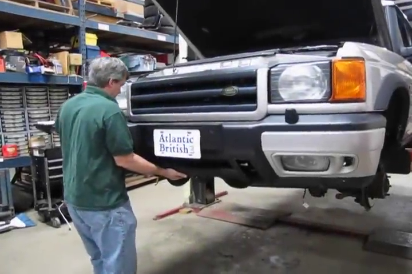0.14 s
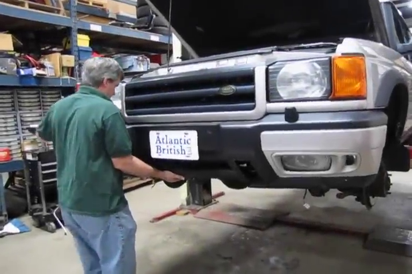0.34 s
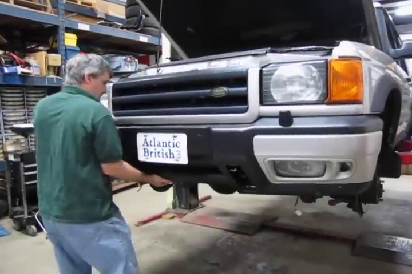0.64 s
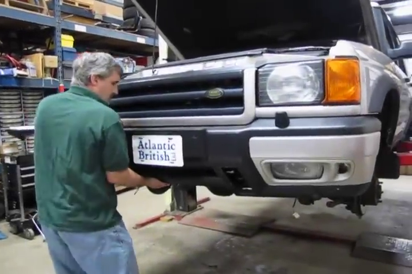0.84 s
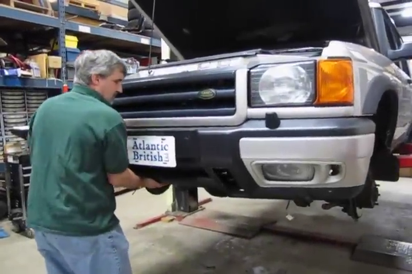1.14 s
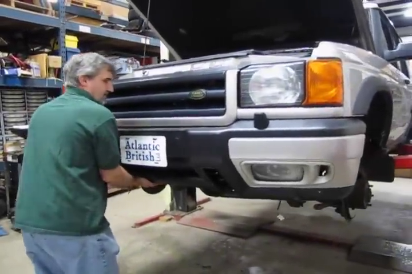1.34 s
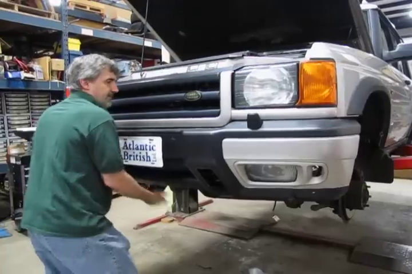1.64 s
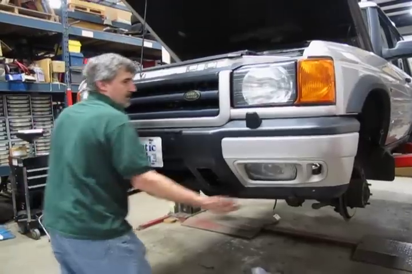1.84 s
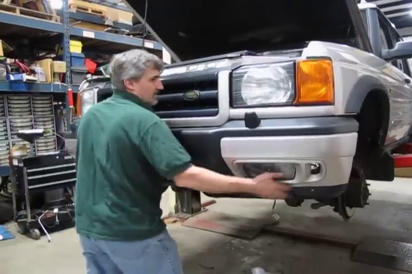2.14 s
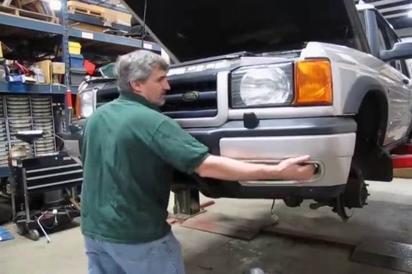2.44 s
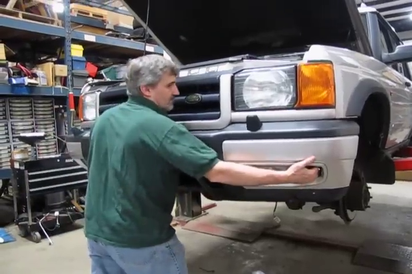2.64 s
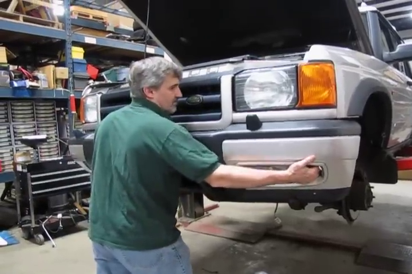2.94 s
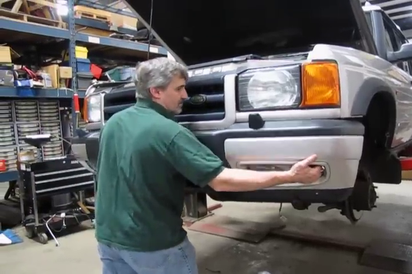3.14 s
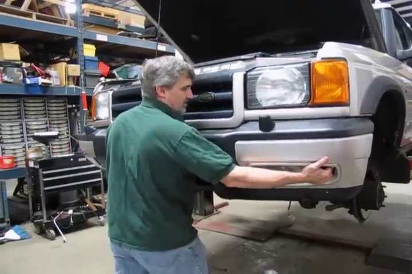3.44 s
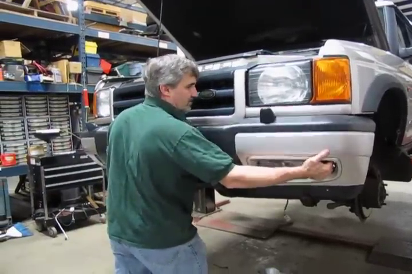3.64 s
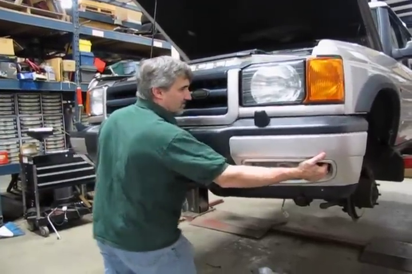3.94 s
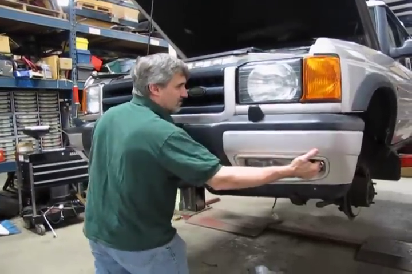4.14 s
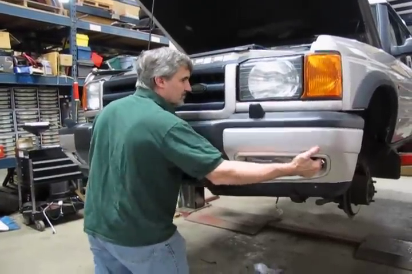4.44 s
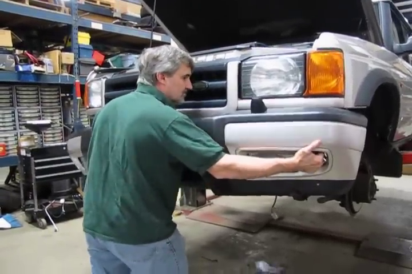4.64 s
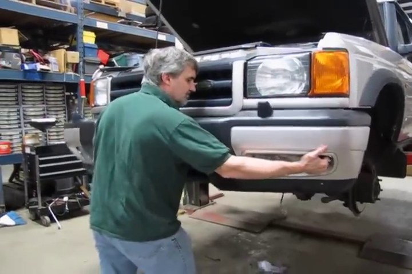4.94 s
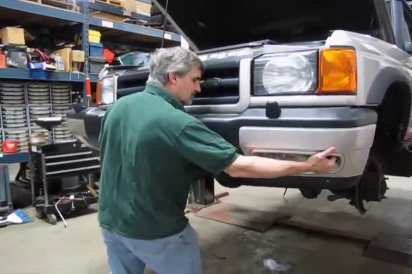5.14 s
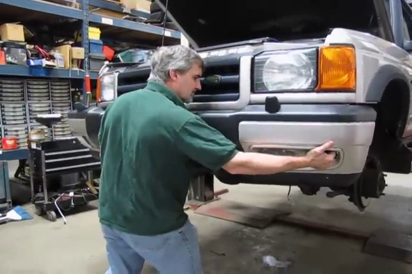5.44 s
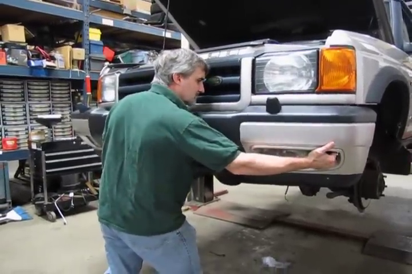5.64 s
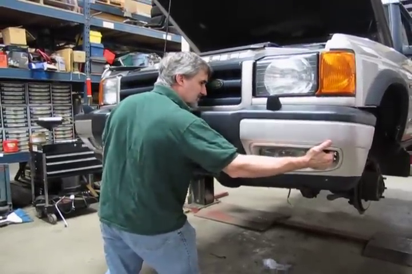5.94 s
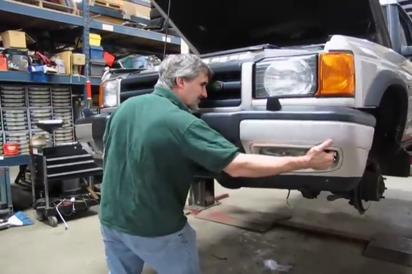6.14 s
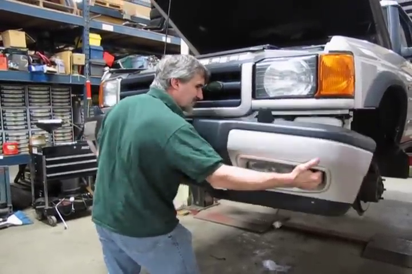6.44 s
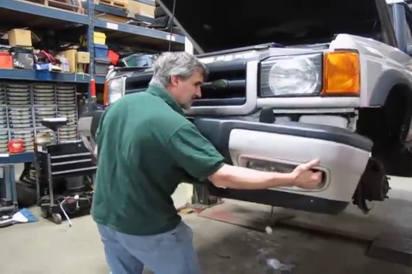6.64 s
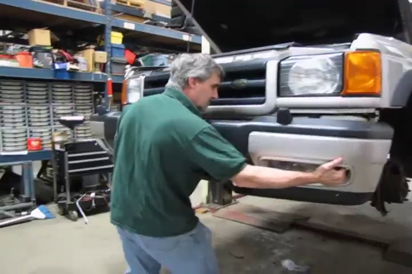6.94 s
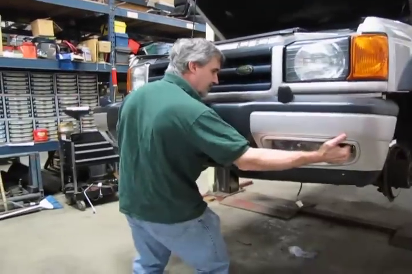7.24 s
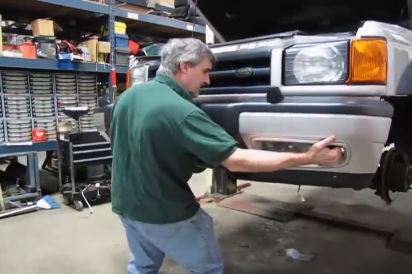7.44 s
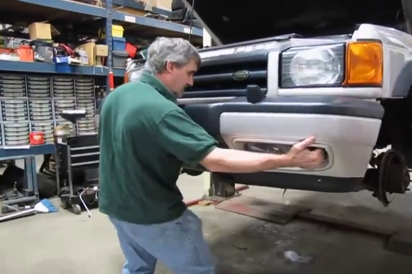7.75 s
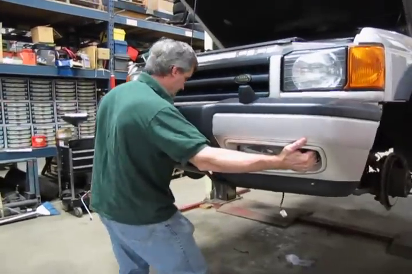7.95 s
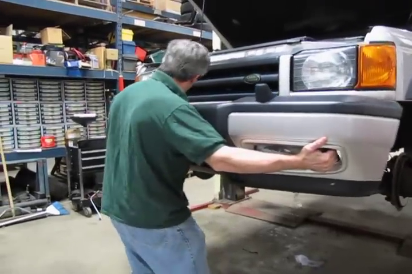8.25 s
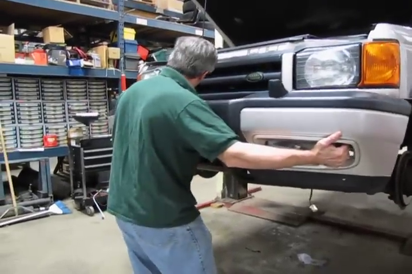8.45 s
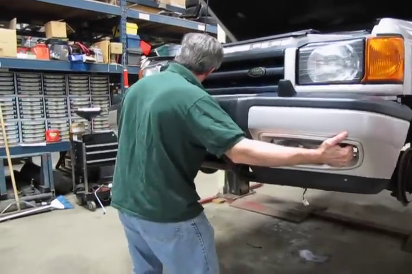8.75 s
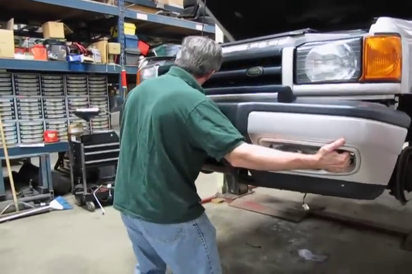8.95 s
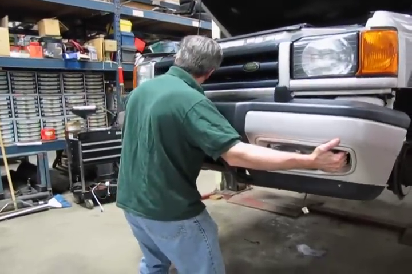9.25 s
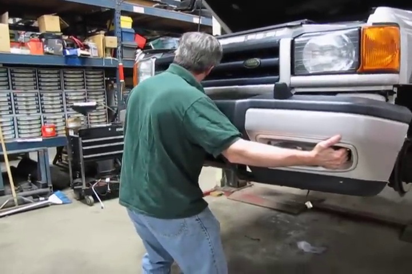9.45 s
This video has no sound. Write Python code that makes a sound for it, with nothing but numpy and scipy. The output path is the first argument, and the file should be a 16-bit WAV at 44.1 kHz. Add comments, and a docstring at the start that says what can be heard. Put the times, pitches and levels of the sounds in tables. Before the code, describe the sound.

In a humming workshop, a heavy hollow metal bumper is rocked and dragged off its brackets, knocking, rattling and scraping, then coming free with loud clunks.

```python
"""Workshop machines hum while a heavy steel car bumper with a plastic cover is rocked and dragged off its brackets.
It knocks, chatters and scrapes, and shoes scuff the floor; then it drops free with two loud clunks.
The automatic gain control ducks at the loudest clunk and recovers slowly; soft bumps follow as a higher hum swells.
Noise and random tiny contacts make the rubbing, grit and snaps; fading vibrations make the bumper and steel ring."""
import sys
import numpy as np
from scipy import signal
from scipy.fft import rfft, irfft, next_fast_len
from scipy.io import wavfile
from scipy.ndimage import uniform_filter1d

SR = 44100
rng = np.random.default_rng(int(sys.argv[2]) if len(sys.argv) > 2 else 0)


def materialize(psi):
    """Save the field psi as 16-bit PCM at rate SR to the path in sys.argv[1].

    A 1-D psi becomes a single channel; in a 2-D psi each row is a channel.
    """
    bounded = np.clip(np.atleast_2d(psi).T, -1, 1)
    quanta = np.round(bounded * 32767).astype(np.int16)
    wavfile.write(sys.argv[1], SR, quanta)


N = 422478  # length in samples
TOP_HZ = 16100  # nothing sounds above this


def amp(db):
    """Decibels to gain."""
    return 10 ** (np.asarray(db) / 20)


def rms(x):
    """Root mean square: the average strength of a sound."""
    return np.sqrt(np.mean(x ** 2) + 1e-20)


def along(points, hz):
    """Read a curve of (Hz, value) points, with pitch on a log axis."""
    f, v = np.transpose(points)
    return np.interp(np.log(hz + 1), np.log(f + 1), v)


def curves(rows):
    """One value per sample for each column after the time."""
    s, *columns = np.transpose(rows)
    return [np.interp(np.arange(N) / SR, s, column) for column in columns]


def wobble(rate, size):
    """A random curve of straight pieces, with rate knots a second."""
    knots = rng.standard_normal(size // 40)
    return np.interp(np.arange(size) * rate / SR, np.arange(size // 40), knots)


def filtered(x, response):
    """Multiply the spectrum of x by a response of frequency."""
    n = x.shape[-1]
    padded = next_fast_len(n + 8192)
    hz = np.fft.rfftfreq(padded, 1 / SR)
    return irfft(rfft(x, padded) * response(hz), padded)[..., :n]


def band(x, edges):
    """Keep only the pitches between two edges in Hz."""
    return signal.sosfilt(signal.butter(3, edges, 'band', fs=SR, output='sos'), x)


# How alike the two ears are. Each row: frequency in Hz, left-right likeness (1 is identical).
EAR_LIKENESS = [(100, 0.96), (300, 0.98), (600, 0.94), (1100, 0.79), (2200, 0.45), (4000, 0.3),
                (8000, 0.047)]


def ear_angle(hz):
    """Likeness as an angle: 0 when both ears are identical."""
    return np.arccos(np.clip(along(EAR_LIKENESS, hz), -1, 1))


def stereo_noise(spectrum, size):
    """Coloured noise, alike in both ears in the bass and nearly unrelated in the treble."""
    def mid_side(hz):
        half = ear_angle(hz) / 2
        return amp(along(spectrum, hz)) * [np.cos(half), np.sin(half)]

    mid, side = filtered(rng.standard_normal((2, size)), mid_side)
    return np.array([mid + side, mid - side])


def dying(x, decay):
    """Each frequency of x dies at its own speed, given as seconds to fall by 60 dB."""
    hz, t, z = signal.stft(x, SR, nperseg=128)
    fade = amp(-60 * t / along(decay, hz)[:, None])
    return signal.istft(z * fade, SR, nperseg=128)[1][:, :x.shape[-1]]


def add(track, s, sound):
    """Mix a sound in at time s, in seconds."""
    part = track[:, max(round(s * SR), 0):][:, :sound.shape[-1]]
    part += sound[:, :part.shape[-1]]


def slips(rate, spread_db, size):
    """Tiny contacts at random moments, about rate a second, with randomly varying strength."""
    chance, strength = rng.random(size), rng.standard_normal(size)
    happens = chance < rate / SR
    return happens * amp(spread_db * np.clip(strength, -2, 2)) * rng.choice([-1, 1], size)


def grains(rate, life, size):
    """Envelope of rms 1: each slip flares up and its power dies within its life in seconds."""
    hits = slips(rate, spread_db=0, size=size) ** 2
    power = signal.lfilter([1], [1, -np.exp(-1 / (life * SR))], hits)
    return np.sqrt(power / power.mean())


def patchy(x, depth_db):
    """As the contact point wanders, different resonances come forward and fall back."""
    z = signal.stft(x, nperseg=1024)[2]
    field = rng.standard_normal(z.shape[1:])
    field = uniform_filter1d(field, size=3, axis=0)  # smooth over frequency
    field = uniform_filter1d(field, size=5, axis=1)  # smooth over time
    return signal.istft(z * amp(depth_db * field / rms(field)), nperseg=1024)[1][:, :x.shape[-1]]


# Colour of the workshop rumble. Each row: frequency in Hz, relative level in dB per Hz.
AIR_COLOUR = [(20, -7.5), (42, 3.5), (70, -3.5), (105, 3.5), (135, -13.5), (220, -16), (300, -26.5),
              (600, -26.5), (1200, -31), (2500, -39), (5000, -39.5), (10000, -47), (16000, -52)]
# Steady motor hums. Each row: frequency in Hz, level in dB.
MOTOR_HUMS = [(59.3, -48), (96, -54), (111, -58.5)]
# A higher hum that swells near the end. Each row: time in seconds, level in dB.
HIGH_HUM = [(0, -59), (7.3, -64), (8.3, -51), (9.58, -48.5)]


def background():
    """Ventilation rumble is coloured noise; motor hums are sines with slightly unsteady timing."""
    t = np.arange(N) / SR

    def tone(hz, drift):  # drift in radians
        return np.sqrt(2) * np.sin(2 * np.pi * hz * t + drift * wobble(rate=9.3, size=N))

    air = stereo_noise(AIR_COLOUR, size=N)
    hum = sum(amp(db) * tone(hz, drift=hz / 160) for hz, db in MOTOR_HUMS)
    high_hum = amp(curves(HIGH_HUM)[0]) * tone(194, drift=0.13)
    return amp(-43.0) * air / rms(air) + hum + high_hum


# How long the hall echoes. Each row: frequency in Hz, time to fall by 60 dB in seconds.
HALL_DECAY = [(150, 0.28), (500, 0.4), (2500, 0.51), (7000, 0.51), (14000, 0.17)]


def workshop(x, wet_db):
    """Diffuse echo of the cluttered hall: a fresh noise tail answers each quarter second of sound."""
    out, step = np.zeros((2, N)), SR // 4
    colour = [(100, 7.5), (2000, 0.5), (6000, -0.5), (15000, -0.5)]  # Hz, relative dB
    for start in range(0, N, step):
        tail = dying(stereo_noise(colour, size=SR * 2 // 3), HALL_DECAY)
        tail = tail / np.linalg.norm(tail[0])
        echo = signal.fftconvolve(x[:, start:start + step], tail, axes=1)
        add(out, start / SR + .008, echo)  # the echo sets in 8 ms late
    return amp(wet_db) * out


# Shoes twisting on the concrete. Each row: start in seconds, length in seconds, level in dB.
SHOE_SCUFFS = [(0.29, 0.12, -31.5), (0.653, 0.1, -33), (1.064, 0.17, -34), (2.041, 0.12, -36),
               (2.175, 0.14, -28.5), (8.139, 0.064, -26)]
# Colour of the sole, with a faint squeak near 1.7 kHz. Each row: frequency in Hz, relative level in dB per Hz.
SOLE_COLOUR = [(200, -10.5), (700, -9), (1150, -13), (1450, -5.5), (1700, -0.5), (2050, -6.5), (2700, -9),
               (3900, -8.5), (6000, -16.5), (10000, -27.5), (16000, -35)]


def scuffs():
    """A rubber sole drags over gritty concrete: many short grains of noise swell and fade with the pressure."""
    out, t = np.zeros((2, N)), np.arange(SR // 5) / SR
    for s, length, db in SHOE_SCUFFS:
        pressure = np.sin(np.pi * np.clip(t / length, 0, 1)) ** 1.65
        drag = grains(rate=1700, life=0.0016, size=len(t)) * stereo_noise(SOLE_COLOUR, len(t))
        add(out, s, amp(db) * pressure * drag / rms(drag))
    return out


# Blows of the bumper on its brackets, and a few soft bumps and footfalls. Each row: time in seconds,
# strength in dB, hardness in dB per octave, thud over the strength in dB, chatter time in seconds.
BLOWS = [(.12, -48, -11, -9, 0.032), (.664, -41.5, 5.5, 0, 0.047), (0.739, -49, -9, 7, 0.02),
         (1.303, -31, 0.3, 1.5, 0.032), (1.565, -32.5, -1.5, -4, 0.02), (1.687, -28.5, 0.4, -8, 0.01),
         (2.011, -36.5, -2, 3.5, 0.04), (2.269, -31.5, -1.5, 0, 0.024), (2.479, -48.5, -6, 16, 0.017),
         (2.903, -27, -1, -3, 0.024), (2.933, -24.5, -0.5, -3.5, 0.017), (3.019, -39.5, 1.5, 13, 0.012),
         (3.075, -38.5, -4, 3, 0.011), (3.113, -43, -1.5, 1, 0.017), (3.192, -39.5, -6, 14, 0.0053),
         (3.2, -34, 2, -3.5, 0.022), (3.223, -30.5, 2.5, -15.5, 0.037), (3.297, -26, 0, 2.5, 0.03),
         (3.587, -36, -13, 13.5, 0.023), (3.611, -35.5, 2, -2, 0.013), (3.66, -34.5, -1.5, 5, 0.026),
         (3.723, -30.5, 3.5, 3, 0.018), (3.87, -29.5, -1, 2.5, 0.025), (3.974, -28.5, -4.5, -17, 0.021),
         (4.033, -28, -2.5, 2.5, 0.011), (4.079, -24.5, -2.5, -5.5, 0.013), (4.089, -22.5, -3, -12, 0.022),
         (4.217, -37.5, 2.5, -15, 0.012), (4.344, -28, 2, -13, 0.018), (4.359, -29, -1.5, -8, 0.019),
         (4.479, -26, -3.5, -34, 0.009), (4.64, -33, -5, -1, 0.017), (4.651, -29.5, -0.5, 3, 0.03),
         (4.727, -24.5, 0, -5.5, 0.0054), (5.035, -41, -4, -15, 0.016), (5.1, -37, -0.5, -15, 0.027),
         (5.148, -28, -7.5, -21, 0.02), (5.162, -45.5, 9.5, 14, 0.056), (5.398, -39.5, -9, 9.5, 0.027),
         (5.578, -39.5, -8, 4, 0.022), (5.624, -32, 4, -5, 0.0044), (5.631, -31.5, -5.5, -3, 0.0069),
         (5.823, -37.5, 2.5, 3, 0.016), (5.845, -30.5, 1.5, 0.5, 0.036), (6.026, -35, -4, -1.5, 0.026),
         (6.226, -22.5, -2, 4.5, 0.022), (6.24, -21.5, 1, 3, 0.015), (6.262, -27.5, 2.5, -6.5, .012),
         (6.367, -34, -0.5, 3.5, 0.0064), (6.431, -14, 1, -3.5, 0.0082), (6.451, -28, -7.5, -8, 0.01),
         (6.655, -48.5, 3.5, -4, 0.041), (6.708, -47, -0.5, 9, 0.016), (7.671, -59, -2.5, -1.5, 0.02),
         (7.837, -57, -3.5, -9.5, 0.0094), (7.9, -59, -2.5, -9, 0.014), (8.141, -34.5, 0, -11, 0.0038),
         (8.197, -41, 1.5, 2, 0.0079), (8.598, -56, 0.5, -18, 0.006), (8.654, -53.5, -3, -8, 0.013),
         (8.941, -54.5, -12, -12, 0.017), (9.05, -57.5, -8, -4, 0.025), (9.099, -57.5, -7, 10, 0.014),
         (9.224, -52, -5, 2, 0.016), (9.397, -55.5, -2, 14, 0.016), (9.441, -68, 8.5, 0, 0.033)]
SHIFT_S = 0.045  # fading time of the shifting after a blow, in seconds


def shifting():
    """Envelope of the rubbing that each blow sets off; it dies as the bumper settles."""
    jolts = np.zeros(N)
    for s, db, *_ in BLOWS:
        jolts[round(s * SR)] = amp(db)
    return signal.lfilter([1], [1, -np.exp(-1 / (SHIFT_S * SR))], jolts)


# Rubbing between the blows. Each row: time in seconds, groan in dB, rasp in dB, both before the trims below.
RUBBING_LEVELS = [(0.0, -37, -43), (.27, -52, -42), (.58, -43.5, -50.5), (.76, -41, -47.5),
                  (1.05, -48, -41), (1.26, -53, -48), (1.41, -37, -41), (1.53, -40.5, -39.5),
                  (1.76, -43, -42.5), (1.92, -51, -49), (2.16, -54, -38), (2.51, -43.5, -44.5),
                  (2.85, -50.5, -54.5), (3.02, -33.5, -40), (3.2, -28, -38.5), (3.5, -44.5, -47),
                  (3.9, -39, -42), (4.1, -31, -52), (4.2, -36.5, -46), (4.3, -29, -32.5),
                  (4.51, -30.5, -41.5), (5.47, -43, -48), (6.15, -34, -40), (6.4, -32, -33),
                  (6.6, -50, -40.5), (6.8, -52, -53), (7.1, -59, -63.5), (7.76, -66.5, -61),
                  (8.35, -49.5, -47), (8.64, -54.5, -58), (9.58, -50, -55)]
# Colours of the groan, the rasp and a catching edge. Each row: frequency in Hz, relative level in dB per Hz.
GROAN_COLOUR = [(90, -3.5), (160, -4.5), (225, 8), (270, -3), (330, -3), (420, 2.5), (520, -5), (700, -8),
                (1000, -11.5), (1700, -12.5), (3500, -60)]
RASP_COLOUR = [(500, 2), (1200, -3), (2000, -0.5), (3500, -1.5), (6000, -7.5), (9000, -13.5), (15000, -22)]
CATCH_COLOUR = [(100, -33), (250, -0.5), (500, -3.5), (900, -2.5), (1600, -31), (3000, -15), (6000, -33.5),
                (16000, -44.5)]
GROAN_DB, RASP_DB, CATCH_DB = -1.5, -4.5, -7.5  # trims of coarse slips, fine slips and catching edges
SHIFT_GROAN_DB, SHIFT_RASP_DB = -9, -15  # rubbing set off by a blow, relative to its strength


def rubbing():
    """The bumper's weight drags on the brackets: coarse slips groan, fine ones rasp, and some edges catch."""
    groan_db, rasp_db = curves(RUBBING_LEVELS)
    shift = shifting()
    groan = grains(rate=120, life=0.014, size=N) * patchy(stereo_noise(GROAN_COLOUR, N), depth_db=3.5)
    rasp = grains(rate=780, life=0.0076, size=N) * patchy(stereo_noise(RASP_COLOUR, N), depth_db=2.5)
    catches = grains(rate=17, life=0.0022, size=N) * stereo_noise(CATCH_COLOUR, N)
    # steady rubbing and the shift after a blow add up in power
    groan_gain = np.hypot(amp(groan_db + GROAN_DB), amp(SHIFT_GROAN_DB) * shift)
    rasp_gain = np.hypot(amp(rasp_db + RASP_DB), amp(SHIFT_RASP_DB) * shift)
    catch_gain = amp((groan_db + rasp_db) / 2 + CATCH_DB)
    return (groan_gain * groan / rms(groan) + rasp_gain * rasp / rms(rasp)
            + catch_gain * catches / rms(catches))


# Dry snaps of the plastic cover and of grit. Each row: time in seconds, lowest Hz, highest Hz, level in dB.
DRY_SNAPS = [(2.05, 1340, 4180, -21.5), (2.067, 1400, 4230, -23), (2.914, 800, 2200, -15),
             (2.936, 1000, 2200, -18), (3.116, 2400, 3800, -30), (3.019, 8000, 14000, -42),
             (3.165, 7440, 9000, -35), (3.2, 2200, 12000, -35), (3.302, 1200, 2400, -20),
             (3.224, 1495, 10600, -25), (3.364, 2560, 3700, -21), (3.613, 4140, 9000, -20.5),
             (3.72, 2000, 10500, -23.5), (3.878, 2580, 15500, -23), (4.722, 2500, 15000, -22),
             (5.6229, 2810, 5160, -15.5), (5.622, 9000, 15500, -22), (5.845, 2400, 15500, -20.5),
             (6.432, 1790, 9000, -5), (8.141, 1490, 6000, -26), (8.598, 2200, 3400, -41)]
# Flat noise, also used by the squeaks. Each row: frequency in Hz, level in dB per Hz.
FLAT = [(20, 0), (20000, 0)]
SNAP_FADE_S = 0.0031


def snaps():
    """A snap is a brief crack of noise in one band, with no weight behind it."""
    out, t = np.zeros((2, N)), np.arange(SR // 25) / SR
    for s, low_hz, high_hz, db in DRY_SNAPS:
        crack = band(stereo_noise(FLAT, len(t)), (low_hz, min(high_hz, TOP_HZ)))
        add(out, s - .001, amp(db) * np.exp(-t / SNAP_FADE_S) * crack / rms(crack))
    return out


# Each contact favours a few modes (natural vibrations) of the touched part, which ring out over it.
# Each row: time in seconds, frequency in Hz, level in dB, time to fall by 60 dB in seconds.
FAVOURED_MODES = [(.12, 683, -34.5, 0.23), (.665, 272, -31, 0.073), (.71, 334, -41, .15),
                  (0.751, 247, -37, 0.18), (1.304, 1953, -23.5, 0.095), (1.308, 1470, -27, 0.15),
                  (1.345, 1990, -22.5, 0.063), (1.618, 588, -26, 0.12), (1.636, 1000, -31, .07),
                  (1.645, 2020, -29, .06), (1.687, 566, -23.5, 0.083), (2.013, 245, -17, 0.12),
                  (2.011, 406, -19.5, 0.069), (2.05, 1606, -18, 0.034), (2.065, 1620, -23, 0.066),
                  (2.239, 1630, -33.5, 0.091), (2.266, 388, -22, 0.21), (2.48, 258.3, -22.5, 0.19),
                  (2.48, 470, -19, 0.032), (2.909, 730, -18, 0.062), (2.932, 248, -14, 0.12),
                  (2.934, 1910, -18.5, 0.046), (3.029, 198, -20.5, 0.15), (3.076, 407, -25, .06),
                  (3.096, 223, -29.5, .18), (3.192, 357, -26, 0.072), (3.234, 209.5, -20.5, 0.36),
                  (3.221, 1565, -22, 0.12), (3.299, 201.5, -16.5, 0.17), (3.302, 2040, -21.5, .06),
                  (3.376, 433, -20.5, 0.066), (3.723, 1920, -37, .1), (3.869, 1988, -23.5, .08),
                  (3.869, 3240, -25, 0.11), (3.868, 618, -25.5, 0.081), (3.975, 725, -33, 0.16),
                  (4.073, 258, -5, 0.11), (4.089, 269.5, -3.5, 0.11), (4.09, 383, -5.5, 0.07),
                  (4.344, 834, -20.5, 0.14), (4.341, 1770, -19.5, .09), (4.343, 1949, -14, 0.11),
                  (4.347, 2276, -18, 0.12), (4.343, 2480, -17, 0.09), (4.346, 2704, -19, 0.21),
                  (4.343, 3187, -22.5, 0.13), (4.344, 4500, -21, 0.13), (4.495, 723, -16, 0.15),
                  (4.572, 2710, -27.5, 0.065), (4.736, 1650, -21, .08), (4.685, 261, -22.5, 0.08),
                  (4.728, 986, -14.5, 0.086), (5.149, 472, -23, 0.22), (5.624, 430, -10, 0.065),
                  (5.627, 384, -14.5, 0.082), (5.624, 624, -19, 0.032), (5.622, 1380, -20, .035),
                  (5.871, 208, -14, 0.065), (6.225, 271, -11, 0.14), (6.226, 607.5, -15.5, 0.24),
                  (6.245, 427.5, -15.5, 0.14), (6.431, 468, -14.5, 0.19), (6.431, 983, -5.5, 0.057),
                  (6.432, 2110, -9, 0.069), (6.432, 2366, -12, 0.046), (7.672, 472, -47, .2),
                  (7.838, 475, -49, 0.12), (7.9, 477, -48, .14), (8.141, 900, -16, 0.017),
                  (8.169, 1900, -30, .08), (8.198, 206, -16, 0.072), (8.945, 422, -43.5, 0.27),
                  (9.23, 426, -34, 0.13), (9.397, 1560, -49, .1)]


def rings():
    """The favoured modes swell within a few cycles and die; the loose bumper makes them waver."""
    out, t = np.zeros((2, N)), np.arange(SR // 4) / SR
    side = np.array([[.5], [-.5]])
    for s, hz, db, t60 in FAVOURED_MODES:
        waver = 0.6 * wobble(rate=100, size=len(t)) + rng.uniform(0, 2 * np.pi)
        between_ears = side * ear_angle(hz) * rng.choice([-1, 1])
        swell = 1 - np.exp(-t * hz / 0.5)
        envelope = amp(db - 60 * t / max(t60, .01)) * swell
        add(out, s - .001, envelope * np.sin(2 * np.pi * hz * t + waver + between_ears))
    return out


# Modes of the steel brackets. Each row: frequency in Hz, relative level in dB, time to fall by 60 dB in seconds.
STEEL_MODES = [(1685, -3, .16), (1947, 0, .15), (2374, 0, .12), (2725, -2, .16), (3289, -6, .12),
               (4184, -9, .1), (4920, -11, .14), (5720, -7, .13), (5920, -6, .13), (6094, -7, .14),
               (6235, -6, .14), (8085, -14, .12), (9910, -15, .12)]


def brackets(t):
    """Steel modes are fading sines, at fresh strengths in each ear."""
    ring = 0
    for hz, db, t60 in STEEL_MODES:
        level_db = db + rng.normal(0, 4.5, (2, 1)) - 60 * t / t60
        phase = rng.uniform(0, 2 * np.pi, (2, 1))
        ring = ring + amp(level_db) * np.sin(2 * np.pi * hz * t + phase)
    return ring / rms(ring[:, :SR // 32])


# Squeaks of steel snatching over steel. Each row: time in seconds, pitch in Hz, width in Hz,
# strength in dB, fading time in seconds.
STEEL_SQUEAKS = [(0.667, 5930, 4000, -39, .02), (0.68, 2970, 900, -34, 0.025),
                 (2.066, 1700, 450, -33, .028), (2.933, 5600, 600, -38, 0.012),
                 (3.222, 1900, 910, -19.5, 0.022), (3.223, 3870, 1310, -20, 0.013),
                 (3.223, 5960, 985, -20, 0.0086), (4.343, 2490, 1670, -26, 0.032),
                 (4.343, 4500, 690, -28.5, 0.014), (5.163, 5830, 1200, -26, 0.016),
                 (5.163, 9960, 1600, -31, 0.0079)]
SQUEAK_RING_DB = -10  # ring of the brackets, relative to the squeak's strength


def squeaks():
    """A snatch sets one rough band of the bracket singing for a moment, and leaves the steel ringing."""
    out, t = np.zeros((2, N)), np.arange(SR // 5) / SR
    for s, hz, width, db, fade in STEEL_SQUEAKS:
        song = band(stereo_noise(FLAT, len(t)), (hz - width / 2, hz + width / 2))
        squeak = amp(db + 5.0) * np.exp(-t / max(fade, .002)) * song / rms(song)
        add(out, s - .001, squeak + amp(db + SQUEAK_RING_DB) * brackets(t))
    return out


# The bumper's hollow body. Each row: frequency in Hz, width in Hz, relative level in dB.
BODY_MODES = [(160, 40, -22), (228, 42, -6), (270, 22, 4), (393, 42, -3.5), (428, 42, -1), (615, 50, -4),
              (705, 55, -3), (950, 170, -8), (2000, 450, -10)]
# Its dense higher modes. Each row: frequency in Hz, relative level in dB.
SHELL_COLOUR = [(60, -41), (170, -20), (250, -7), (500, -1), (900, -8), (1600, -7), (2200, -8), (3000, -10),
                (4400, -18.5), (7500, -34.5), (11000, -34), (16000, -47)]
# How fast those die. Each row: frequency in Hz, time to fall by 60 dB in seconds.
SHELL_FADE = [(150, 0.218), (500, 0.053), (2000, 0.15), (6000, 0.067), (14000, 0.011)]


def bumper(force, body_db):
    """The shell's answer to a force: fading noise for its dense modes and fading sines for its hollow body."""
    t = np.arange(SR // 6) / SR
    shell = dying(stereo_noise(SHELL_COLOUR, len(t)), SHELL_FADE)
    shell = shell * (1 + amp(9.5) * np.exp(-t / 0.0035))  # the struck spot speaks first and loudest
    body = 0
    for hz, width, db in BODY_MODES:
        # every contact point sets the modes off differently
        strength = amp(db + rng.normal(0, 1.0)) * width * rng.choice([-1, 1])
        body = body + strength * np.exp(-np.pi * width * t) * np.sin(2 * np.pi * hz * t)
    answer = shell / rms(shell) + amp(body_db) * body / rms(body)
    return signal.fftconvolve(force[None], answer, axes=1)[:, :len(force)]


# The thud, knock, clank, crack and sizzle ranges. Each row: lower edge in Hz, upper edge in Hz.
SOUND_RANGES = [(120, 350), (350, 1300), (1300, 4000), (4000, 8000), (8000, 16000)]
PIVOT_HZ = 1200  # hardness tilts the levels around this pitch


def contact_levels(colour_db, db, hardness, thud_db):
    """Level of each range: a harder contact tilts them towards the treble; the weight behind it sets the thud."""
    centres_hz = np.sqrt(np.prod(SOUND_RANGES[1:], axis=1))
    octaves = np.log2(centres_hz / PIVOT_HZ)
    return db + np.array(colour_db) + np.append(thud_db, hardness * octaves)


def voiced(x, levels_db, size):
    """A soft contact feeds the low ranges, a hard one the high: set each range's level over the first samples."""
    parts = [band(x, edges) for edges in SOUND_RANGES]
    return sum(amp(db) * part / rms(part[:, :size]) for db, part in zip(levels_db, parts))


# Sliding strokes. Each row: time in seconds, length in seconds, strength in dB, hardness in dB per octave,
# thud over the strength in dB.
STROKES = [(0.093, 0.13, -42, 3, -1), (0.481, 0.18, -45, 6.5, -27), (1.07, 0.1, -56, 8.5, -10),
           (1.35, 0.084, -42.5, 5, 2), (1.614, 0.058, -31, -3.5, 2), (1.72, 0.054, -48, -7, 10),
           (1.977, 0.071, -36, 4, 4), (2.858, 0.15, -37, 0.5, 11), (3.335, 0.056, -31.5, 0.5, -8),
           (3.533, 0.16, -33.5, 5.5, 1), (4.051, 0.11, -23.5, -0.5, 2), (4.447, 0.12, -25.5, 1, -8),
           (4.654, 0.12, -27.5, 0, 6.5), (4.887, 0.12, -35.5, 0, -10), (5.168, 0.076, -32, -4.5, -5),
           (5.77, .05, -49, 8, -4.5), (6.059, 0.13, -41.5, -2, -8.5), (6.312, 0.21, -31.5, 0, -10),
           (7.189, 0.22, -58, 0.5, 3), (7.963, .12, -53.5, 6.5, -14), (8.285, 0.073, -41.5, 1.5, 3),
           (8.357, 0.12, -38, 0.7, -0.5), (9.167, 0.12, -49, -0.5, 2)]
# Colour of a stroke of middling hardness: offsets in dB of the thud, knock, clank, crack and sizzle ranges.
STROKE_RANGES_DB = [-2.5, 3.5, -3, -11, -22.5]
# Rust grinding between steel faces, also in the knocks. Each row: frequency in Hz, relative level in dB per Hz.
GRIT_COLOUR = [(100, 0.5), (260, -3.5), (450, -4), (700, -5), (1400, -13.5), (2100, -7), (3200, -15),
               (4300, -11), (6100, -12.5), (7500, -21), (10000, -29.5), (16000, -46)]


def scrapes():
    """Stick and slip: a dense train of contacts swells and fades with each stroke."""
    out, t = np.zeros((2, N)), np.arange(SR // 3) / SR
    for s, length, db, hardness, thud_db in STROKES:
        levels_db = contact_levels(STROKE_RANGES_DB, db, hardness, thud_db)
        pressure = np.sin(np.pi * np.clip(t / length, 0, 1)) ** 0.36
        force = pressure * slips(rate=900, spread_db=2.5, size=len(t))
        ringing = bumper(force, body_db=-18.5)
        # grit is heard straight from the contact
        grit = patchy(stereo_noise(GRIT_COLOUR, len(t)), depth_db=3.5)
        grit = pressure * grains(rate=900, life=0.0032, size=len(t)) * grit
        stroke = ringing / rms(ringing) + amp(1.0) * grit / rms(grit)
        add(out, s - .008, amp(-3.5) * voiced(stroke, levels_db, size=int(length * SR)))
    return out


# Colour of a blow of middling hardness: offsets in dB of the thud, knock, clank, crack and sizzle ranges.
BLOW_RANGES_DB = [-2.5, 1.5, 1, -7, -18]
BLOW_RING_DB = -13.5  # ring of the brackets, relative to the blow's treble
CRISP_DB, TYPICAL_CHATTER_S = 2, 0.012  # sizzle gained for each halving of the chatter time


def knocks():
    """A blow is a first contact, then a dying chatter of smaller ones; a long chatter starts softly."""
    out, t = np.zeros((2, N)), np.arange(SR // 3) / SR
    for s, db, hardness, thud_db, chatter in BLOWS:
        levels_db = contact_levels(BLOW_RANGES_DB, db, hardness, thud_db)
        # a brief contact is crisper
        levels_db[-1] += CRISP_DB * np.log2(TYPICAL_CHATTER_S / max(chatter, .001))
        u = t / max(chatter, .001)
        contact = np.exp(-u) * (1 - np.exp(-9 * u))
        taps = slips(rate=1500, spread_db=7.0, size=len(t))
        force = 0.36 * uniform_filter1d(taps, size=2) * contact  # later contacts are softer
        force[0] = 1.9 * np.exp(-chatter / 0.017)
        ringing = bumper(force, body_db=-2.5)
        grit = contact * stereo_noise(GRIT_COLOUR, len(t))  # rusty faces grind as they meet
        mixed = ringing / rms(ringing) + amp(-3.5) * grit / rms(grit)
        blow = voiced(mixed, levels_db, size=SR // 32)
        treble_db = (levels_db[2] + levels_db[3]) / 2  # hard blows wake the steel most
        add(out, s - .001, amp(-0.5) * blow + amp(treble_db + BLOW_RING_DB) * brackets(t))
    return out


# Balance between the ears. Each row: frequency in Hz, left minus right in dB.
EAR_BALANCE = [(100, -0.5), (500, -0.4), (1000, -1.1), (2000, -3), (4000, -2.5), (8000, -2), (13000, -2.5)]
LAG_SAMPLES = 1.03  # the right ear is reached first


def scene():
    """The bumper sits a little to the right, in the hall's echo and hum."""
    work = scuffs() + rubbing() + snaps() + rings() + squeaks() + scrapes() + knocks()
    work = work + workshop(work, wet_db=-10.5)
    side = np.array([[.5], [-.5]])

    def placement(hz):
        delay = np.exp(-2j * np.pi * side * hz * LAG_SAMPLES / SR)
        return amp(side * along(EAR_BALANCE, hz)) * delay

    return filtered(work, placement) + background()


def gain_control(x, limit_db, recovery_db, start_db):
    """Gain starts start_db down, falls at once above the limit and climbs back by recovery_db a second."""
    power = np.abs(uniform_filter1d(np.mean(x ** 2, axis=0), size=512))
    level_db = 10 * np.log10(power + 1e-12)
    excess_db = np.maximum(level_db - limit_db, 0)
    excess_db[0] = start_db
    climb = recovery_db * np.arange(N) / SR
    return x * amp(climb - np.maximum.accumulate(excess_db + climb))


def record(dry):
    """Automatic gain control, then a ceiling that clips peaks, then a cut of the highest treble."""
    held = gain_control(dry, limit_db=-9, recovery_db=5.5, start_db=5)
    return filtered(np.clip(held, -.97, .97), lambda hz: hz < TOP_HZ)


dry = scene()
out = record(dry)
materialize(out)
```